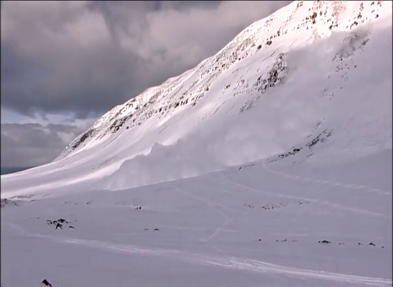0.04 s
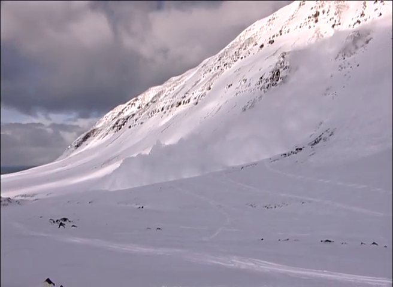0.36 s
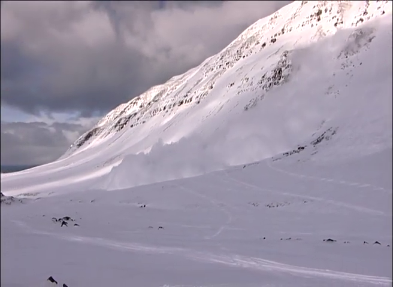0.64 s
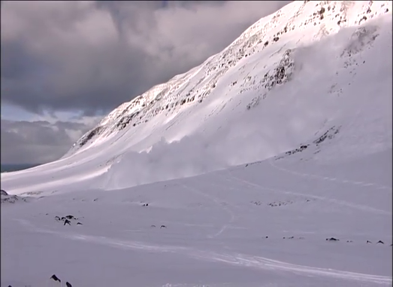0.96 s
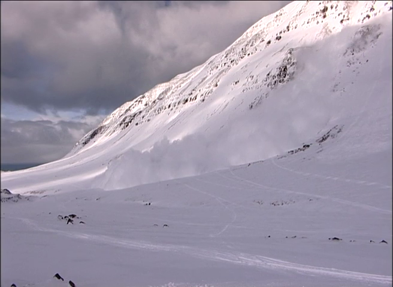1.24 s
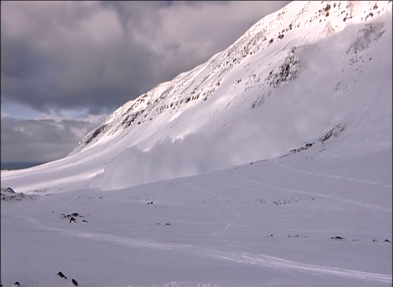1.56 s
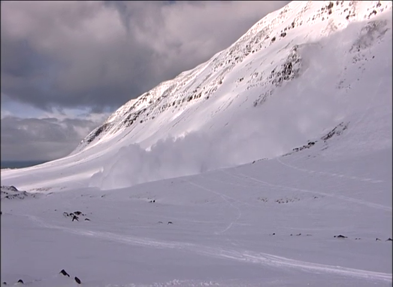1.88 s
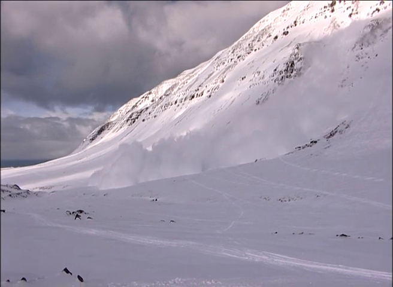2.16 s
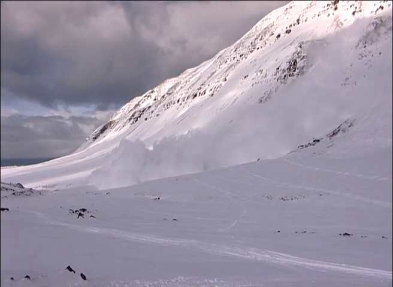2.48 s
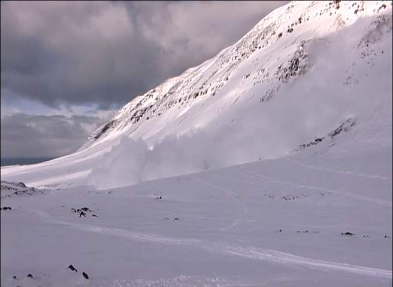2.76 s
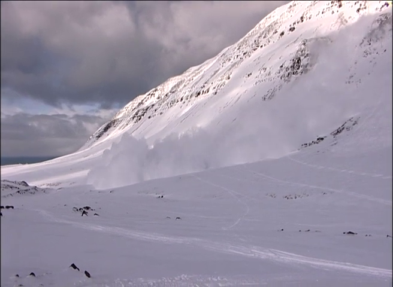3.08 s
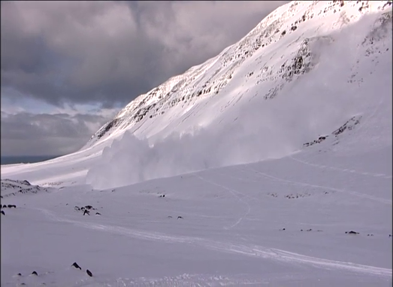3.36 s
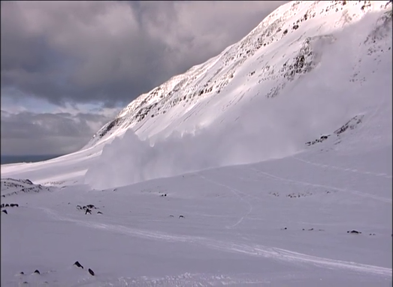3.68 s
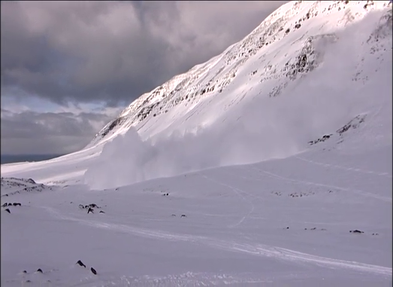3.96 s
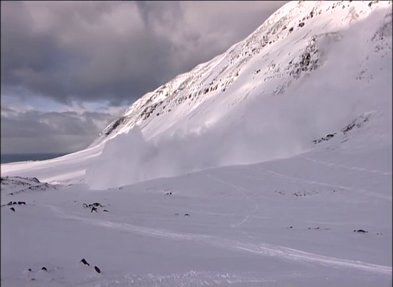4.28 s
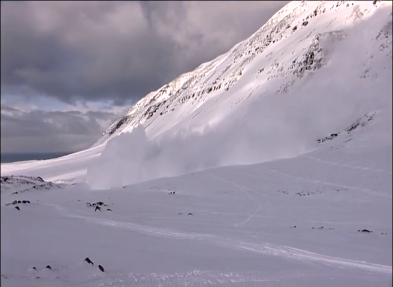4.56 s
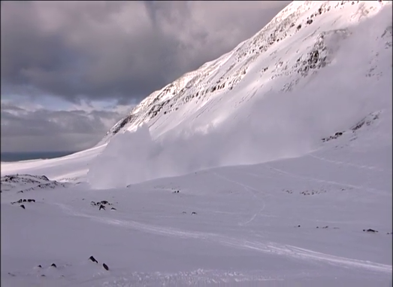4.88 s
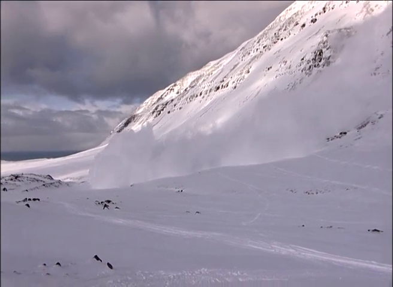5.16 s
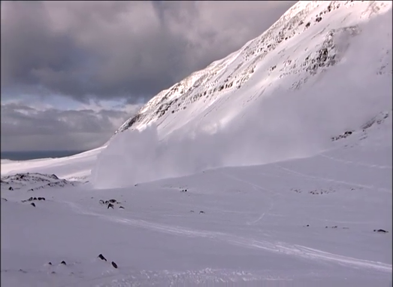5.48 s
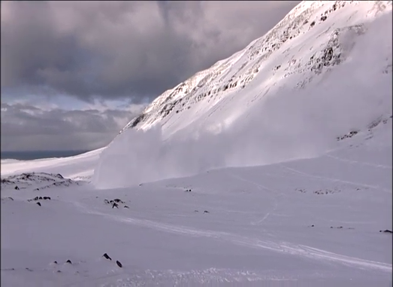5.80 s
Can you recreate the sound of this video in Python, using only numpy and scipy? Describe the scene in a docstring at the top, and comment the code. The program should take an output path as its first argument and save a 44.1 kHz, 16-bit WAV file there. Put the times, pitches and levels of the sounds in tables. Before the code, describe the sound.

A powder-snow avalanche pours down a mountainside, heard from the valley floor as a deep, churning roar with little treble. A few short thuds of tumbling snow slabs sound inside it, mostly in the first two seconds. The rumble swells gently and slowly eases. Close to the microphone are very faint ticks of handled gear and a thin hiss. The roar is much louder on the left.

```python
"""A powder-snow avalanche runs down a mountainside, heard from the valley floor.
Churning snow makes a deep roar that slowly eases. Tumbling slabs thud inside it, and distance takes
the treble away. The right microphone is much weaker than the left. Close by are tiny ticks of
handled gear, faint brushes of clothing, and the camera's own hiss and whine."""
import sys
import numpy as np
from scipy import signal
from scipy.fft import rfft, irfft
from scipy.io import wavfile

SR = 44100
rng = np.random.default_rng(int(sys.argv[2]) if len(sys.argv) > 2 else 0)


def store_pcm(level_fs):
    """Save levels as 16-bit WAV."""
    pcm = np.round(np.clip(level_fs, -1, 1) * 32767).astype(np.int16)
    wavfile.write(sys.argv[1], SR, np.atleast_2d(pcm).T)


N = 257103
TIME = np.arange(N) / SR
FREQS_HZ = np.fft.rfftfreq(N, 1 / SR)

# Tone of the roar after crossing the valley: frequency_hz, relative_db
ROAR_TONE = [(8, -46), (22, 1.5), (50, -1), (115, 0), (170, -2.5), (220, -8.5), (400, -14.5), (800, -23.5),
             (1500, -33), (2200, -42), (3200, -52), (4200, -61), (6000, -74.5), (12000, -100)]
# Waves of snow that swell the roar and change its brightness: peak_s, half_length_s, swell_db, bright_db
SURGES = [(0.084, 0.06, 1.5, -0.7), (0.46, 0.059, .5, 1.6), (.77, 0.24, 1.4, -1), (1.8, 0.035, 2, -.5),
          (3.11, 0.32, 0.6, 0.1), (3.88, 0.17, 0.1, 1.1), (4.534, 0.14, 1.4, 0), (5.195, 0.037, 0.8, 0.5)]
# How alike the roar is on the left and right: frequency_hz, likeness_0_to_1
LIKENESS = [(30, .27), (110, .42), (300, .27), (500, .05), (2000, .02)]
# The heaviest slabs landing: peak_s, left_peak_db, pitch_hz, half_length_s
SLABS = [(0.104, -27, 910, 0.0023), (0.122, -20.5, 523, 0.0019), (0.191, -34, 1200, 0.0022),
         (0.365, -29.5, 850, 0.0066), (1.588, -29, 295, 0.0029), (1.809, -20, 210, 0.0036),
         (1.996, -28, 650, 0.0022), (4.546, -28, 450, 0.003)]
# How much weaker the right microphone is: frequency_hz, gain_db
RIGHT_MIC_GAIN = [(20, -13.7), (45, -13.3), (80, -10.2), (130, -10.2), (240, -9), (600, -10), (1000, -11.4),
                  (1550, -6.9), (3200, -5.6)]
# Ticks of handled gear: peak_s, peak_db, pitch_hz, decay_s, left_minus_right_db
TICKS = [(1.167, -56, 9000, 0.0014, -5), (1.831, -60, 5700, .002, 5), (2.948, -53, 8000, 0.0031, 12),
         (2.9547, -56, 7000, .0015, 10), (2.996, -57.5, 6300, .0012, 12), (3.0145, -60, 7500, .001, 12),
         (3.025, -57, 8500, .0008, 9), (3.1098, -60, 8000, .001, 6), (3.243, -53, 8000, 0.0012, 12)]
# How the gear's small hard parts ring: pitch_hz, width_hz, relative_db
GEAR_RINGS = [(3800, 2000, 5), (6100, 1200, 0), (8700, 1200, 2), (11700, 2700, -6)]
# Brushes of clothing: peak_s, left_level_db, half_length_s
BRUSHES = [(1.81, -73, .025), (2.44, -71.5, .06), (5.2, -75, .025)]
# Tone of the hiss: frequency_hz, left_relative_db, right_relative_db
HISS_TONE = [(100, 15, 8), (4500, -2, -0.6), (7500, -0.5, -0.3), (11000, 0.8, -1), (15500, 4, -1.5)]
# Thin tones from the camera's electronics: pitch_hz, left_db, right_db
WHINES = [(4200, -100, -92), (6600, -105, -97), (15625, -98, -97)]


def avalanche_roar(base_db=-25, ease_db_per_s=0.5, runout_s=4.92, runout_db_per_s=0.8):
    """The roar eases as the slope flattens, and fades faster once the flow runs out."""
    snow = wide_snow_front()
    eased_db = ease_db_per_s * TIME + runout_db_per_s * np.maximum(TIME - runout_s, 0)
    flow_db = base_db - eased_db + sum(db * swell(s, half) for s, half, db, _ in SURGES)
    # Loose powder lifts the sound above about 450 Hz as the cloud grows.
    powder = filtered(snow, FREQS_HZ ** 2 / (FREQS_HZ ** 2 + 450 ** 2))
    powder_db = 0.17 + 0.23 * TIME + sum(db * swell(s, half) for s, half, _, db in SURGES)
    powder_gain = gain_of(powder_db * np.array([[1], [0.94]]))  # left, right
    # The dense core builds up, then holds up the bass below about 150 Hz while the rest eases.
    core = filtered(snow, np.exp(-(FREQS_HZ / 150) ** 2))
    core_gain = gain_of(-0.53 + 0.27 * TIME - 3 * np.exp(-TIME / 0.8))
    return gain_of(flow_db) * (snow + (powder_gain - 1) * powder + (core_gain - 1) * core)


def wide_snow_front(right_delay_s=0.0027):
    """The wide front reaches the microphones as two roars, alike only in the bass."""
    left, other = churning_snow(), churning_snow()
    likeness = np.clip(curve(LIKENESS), 0, 1)
    delay = np.exp(-2j * np.pi * FREQS_HZ * right_delay_s)
    right = filtered(left, likeness * delay) + filtered(other, np.sqrt(1 - likeness ** 2))
    return np.array([left, right])


def churning_snow(billow_db=0.5, billow_hz=7, lumps_per_s=260, size_spread_db=3, lump_db=-7):
    """A swirling snow cloud and countless colliding lumps, dulled by distance."""
    cloud = rng.standard_normal(N) * gain_of(billow_db * wander(billow_hz))
    sizes = gain_of(size_spread_db * np.minimum(rng.exponential(1, N), 3))
    signs = rng.choice([-1, 1], N)
    hits = rng.random(N) < lumps_per_s / SR
    lumps = gain_of(lump_db) * unit_level(sizes * signs * hits)
    return unit_level(filtered(cloud + lumps, gain_of(curve(ROAR_TONE))))


def slab_thuds():
    """Each landing slab gives a short, rounded burst of pressure."""
    dulling = gain_of(curve(ROAR_TONE) / 2)
    out = np.zeros((2, N))
    for peak_s, peak_db, pitch_hz, half_length_s in SLABS:
        burst = filtered(rng.standard_normal((2, N)), band(pitch_hz, octaves=1) * dulling)
        burst *= swell(peak_s, half_length_s)
        out += gain_of(peak_db) * burst / abs(burst).max(axis=1, keepdims=True)
    return out


def uneven_microphones(sound, dip_hz=160, dip_width_hz=36, dip_depth=0.81):
    """The right microphone is weaker and has a dip in the bass."""
    left, right = sound
    dip = 1 - dip_depth / (1 + 1j * (FREQS_HZ - dip_hz) / dip_width_hz)
    return np.array([left, filtered(right, dip * gain_of(curve(RIGHT_MIC_GAIN)))])


def gear_ticks(rise_share=0.54):
    """Tiny scrapes swell and die in a few milliseconds, ringing small hard parts."""
    ringing = sum(gain_of(db) / (1 + ((FREQS_HZ - hz) / (width / 2)) ** 2)
                  for hz, width, db in GEAR_RINGS)
    out = np.zeros((2, N))
    for peak_s, peak_db, pitch_hz, decay_s, pan_db in TICKS:
        rise_or_fall_s = np.where(TIME < peak_s, rise_share * decay_s, decay_s)
        scrape = rng.standard_normal(N) * np.exp(-abs(TIME - peak_s) / rise_or_fall_s)
        tick = filtered(scrape, ringing * band(pitch_hz, octaves=1))
        sides_db = peak_db + np.array([[pan_db], [-pan_db]]) / 2
        out += gain_of(sides_db) * tick / abs(tick).max()
    return out


def clothing_rustle(pitch_hz=4800, right_db=-7):
    """Cloth slides softly on the left, in a few short strokes."""
    sliding = unit_level(filtered(rng.standard_normal((2, N)), band(pitch_hz, octaves=0.5)))
    strokes = sum(gain_of(db) * swell(s, half) for s, db, half in BRUSHES)
    return sliding * strokes * gain_of([[0], [right_db]])


def camera_noise(hiss_db=-66.5):
    """The camera's amplifier hisses steadily, and its electronics add three thin tones."""
    tone_hz, *sides_db = np.transpose(HISS_TONE)
    tone = gain_of([curve(np.column_stack([tone_hz, side])) for side in sides_db])
    hiss = gain_of(hiss_db) * unit_level(filtered(rng.standard_normal((2, N)), tone))
    whine = sum(gain_of([[left_db], [right_db]]) * np.sin(2 * np.pi * (hz * TIME + rng.random()))
                for hz, left_db, right_db in WHINES)
    return hiss + np.sqrt(2) * whine


def gain_of(db):
    """Turns decibels into a number to multiply a sound by."""
    return 10 ** (np.asarray(db) / 20)


def unit_level(sound):
    """Sets the average (rms) level to 1; a stereo pair is scaled by its left side."""
    return sound / np.sqrt(np.mean(np.atleast_2d(sound)[0] ** 2) + 1e-30)


def curve(points):
    """Joins (frequency, value) points with straight lines on a scale of octaves."""
    hz, values = np.transpose(points)
    return np.interp(np.log(FREQS_HZ + 1), np.log(hz + 1), values)


def filtered(sound, gains):
    """Multiplies each frequency in a sound by its own gain."""
    return irfft(rfft(sound) * gains, N)


def band(centre_hz, octaves):
    """Bell-shaped gains that keep the frequencies near a centre."""
    return np.exp(-0.5 * (np.log2((FREQS_HZ + 1) / centre_hz) / octaves) ** 2)


def wander(rate_hz):
    """A slow random drift above and below zero."""
    slow_only = np.exp(-(FREQS_HZ / rate_hz) ** 2) * (FREQS_HZ > 0)
    return unit_level(filtered(rng.standard_normal(N), slow_only))


def swell(peak_s, half_length_s):
    """A smooth rise to 1 and fall back, around one moment."""
    return np.exp(-0.5 * ((TIME - peak_s) / half_length_s) ** 2)


def scene():
    """The far avalanche and the small sounds close by."""
    return uneven_microphones(avalanche_roar() + slab_thuds()) + gear_ticks() + clothing_rustle()


def record(dry, cutoff_hz=15750):
    """The camera adds its own noise and cuts off the highest treble."""
    lowpass = signal.firwin(511, cutoff_hz, window=("kaiser", 9), fs=SR)
    return signal.oaconvolve(dry + camera_noise(), lowpass[None], "same")


dry = scene()
out = record(dry)
store_pcm(out)
```